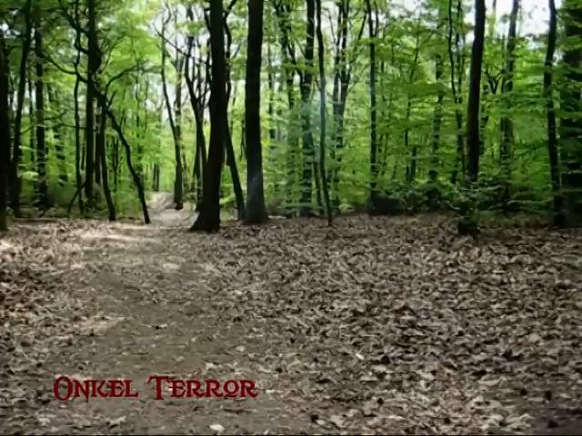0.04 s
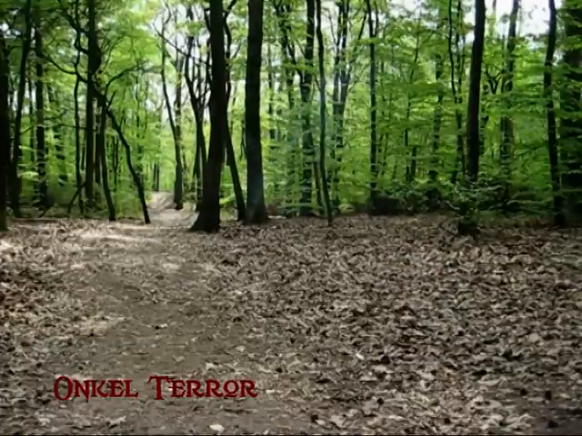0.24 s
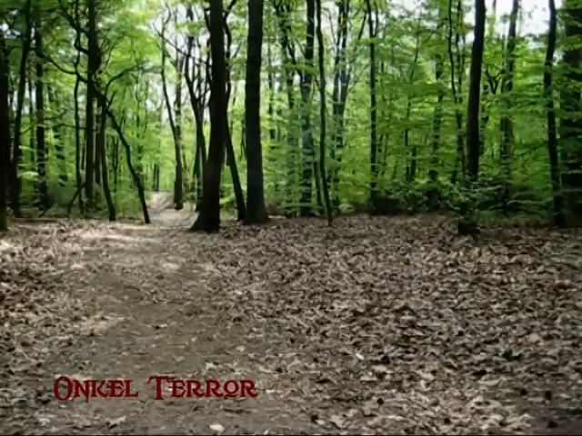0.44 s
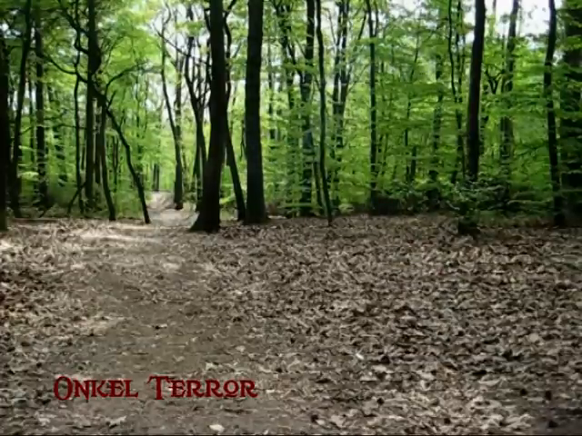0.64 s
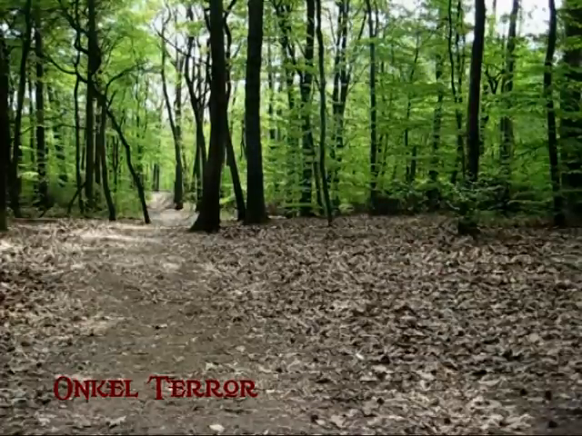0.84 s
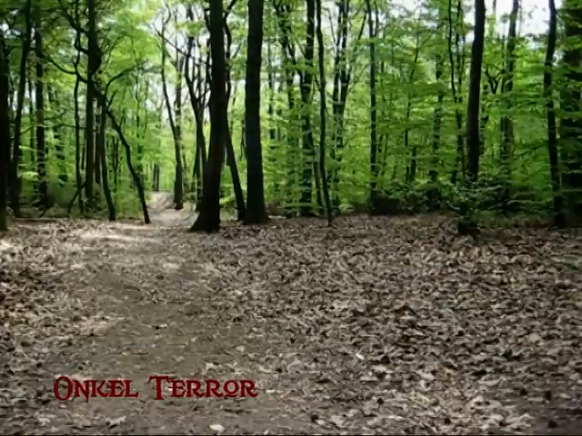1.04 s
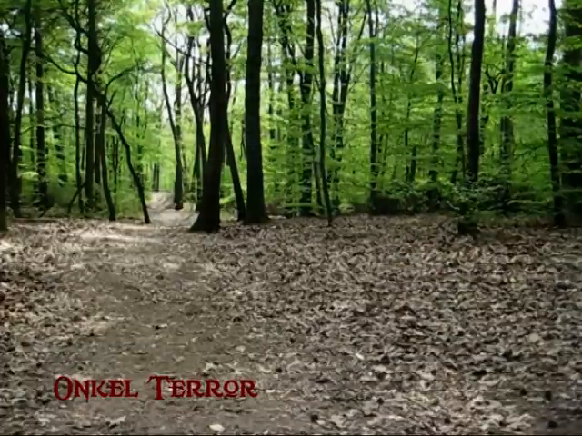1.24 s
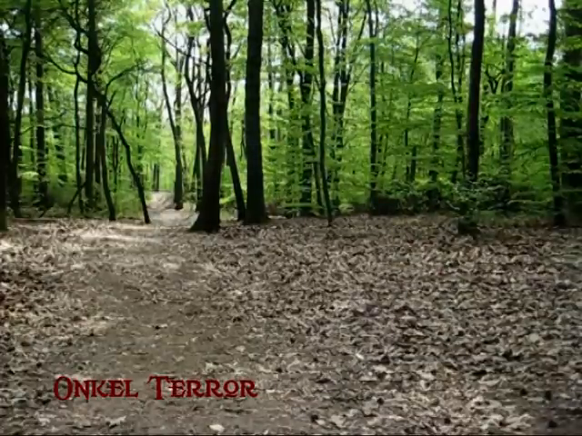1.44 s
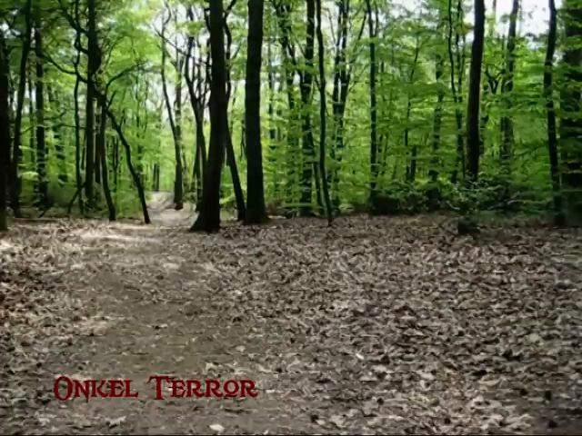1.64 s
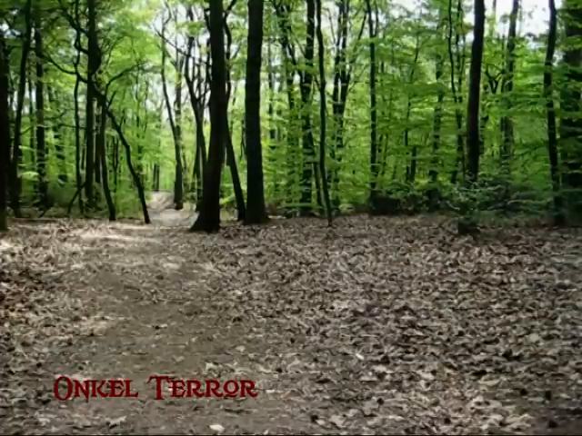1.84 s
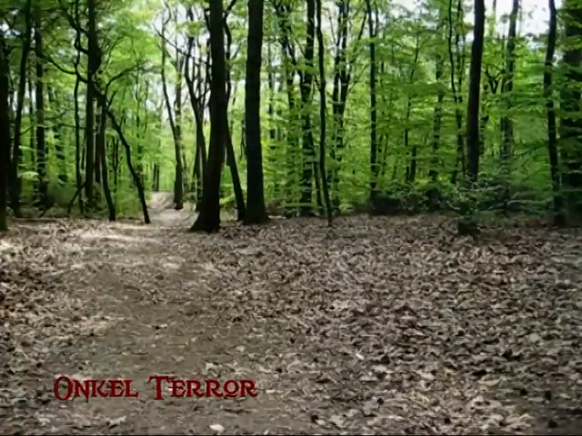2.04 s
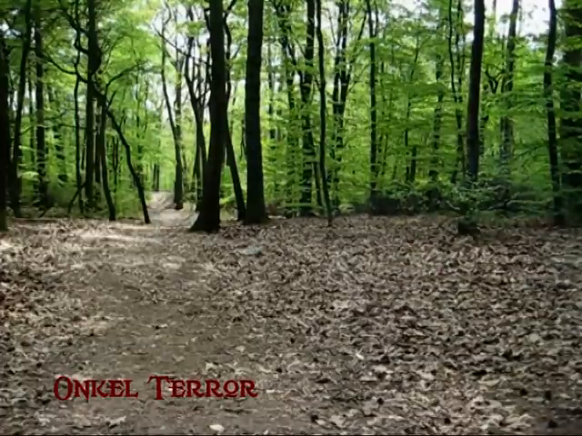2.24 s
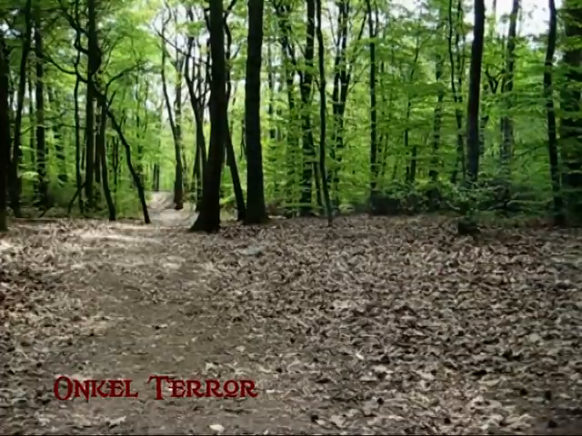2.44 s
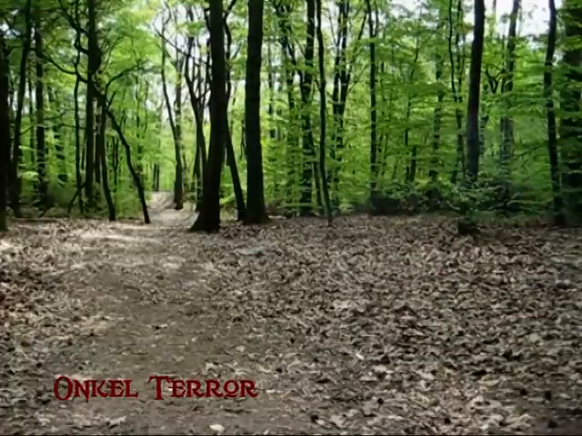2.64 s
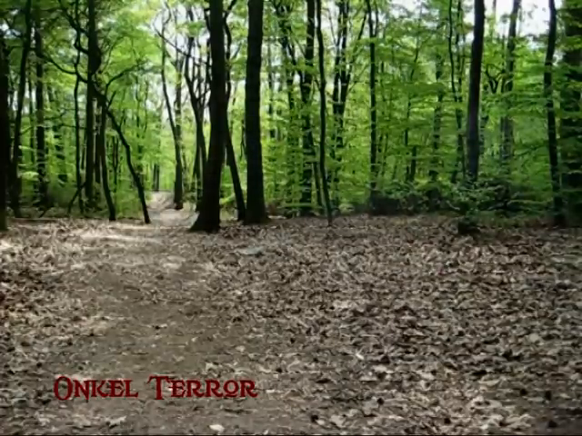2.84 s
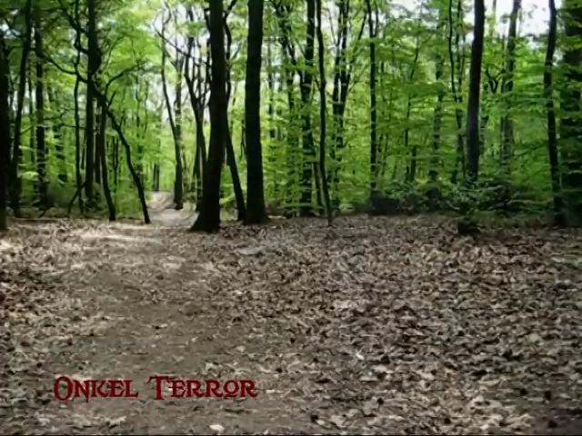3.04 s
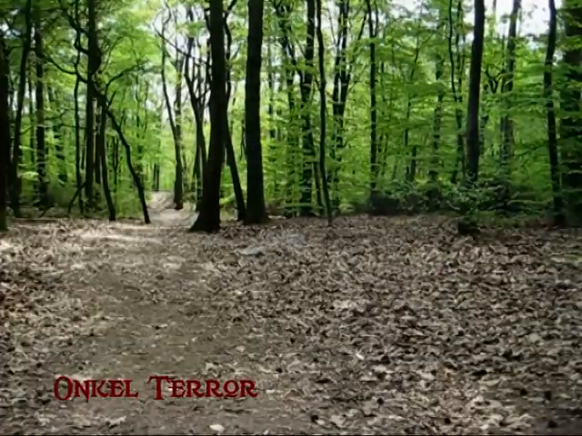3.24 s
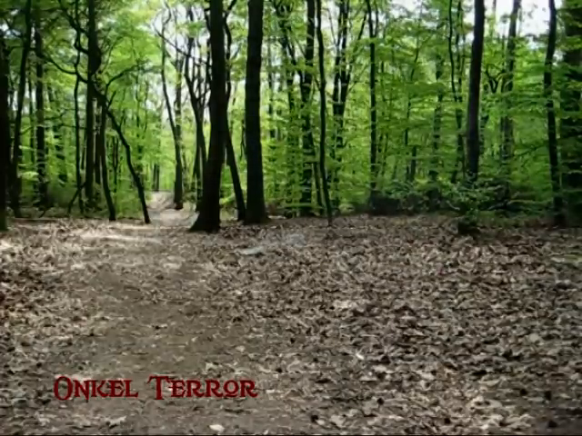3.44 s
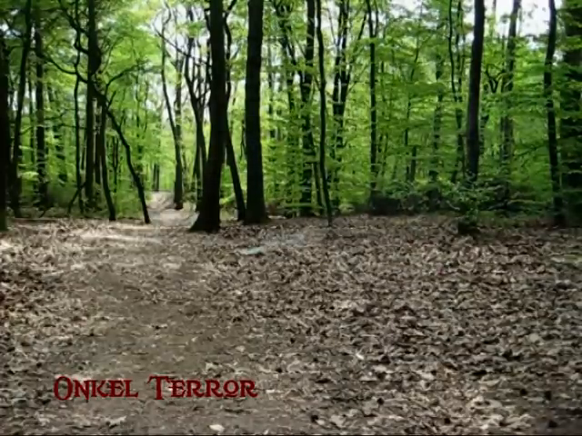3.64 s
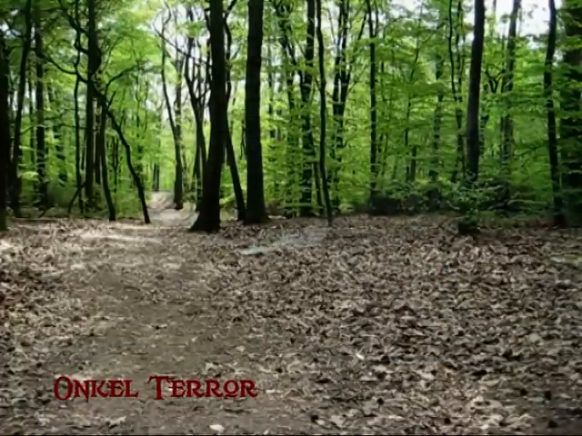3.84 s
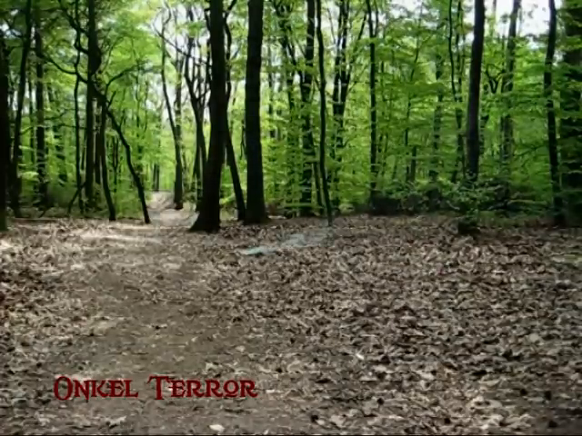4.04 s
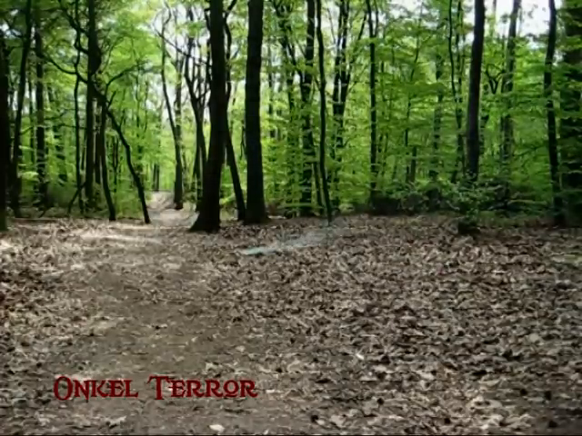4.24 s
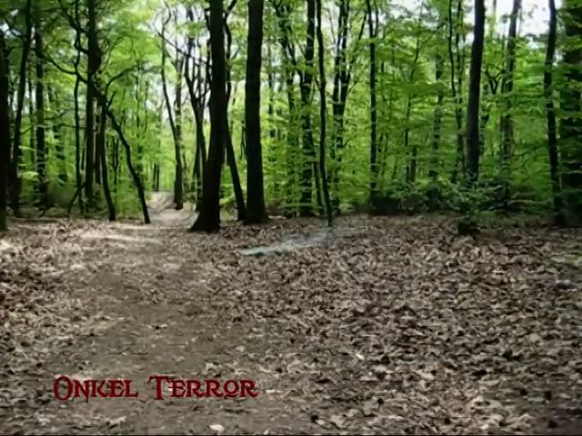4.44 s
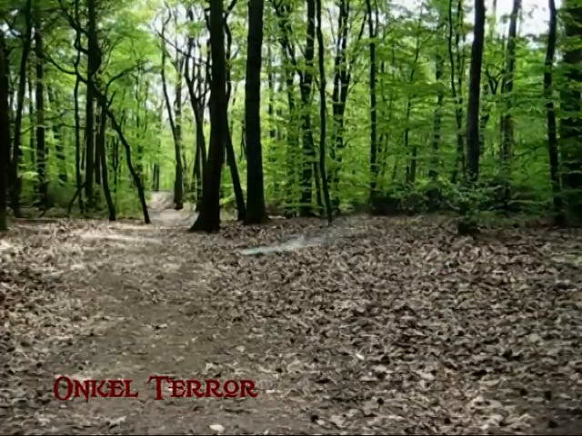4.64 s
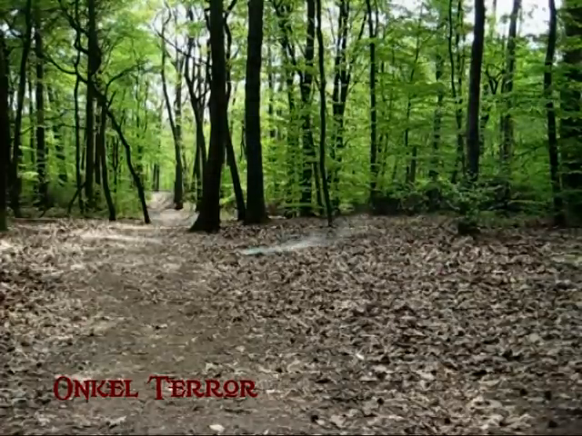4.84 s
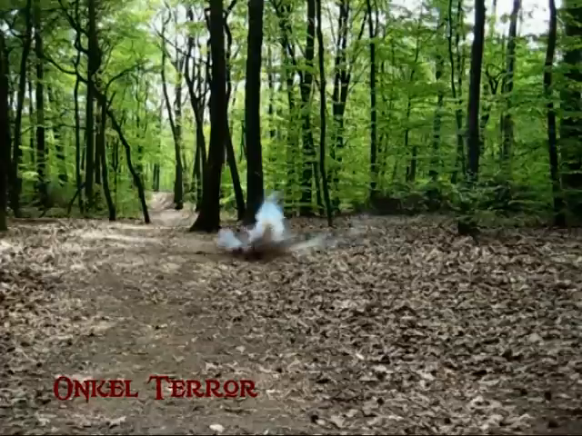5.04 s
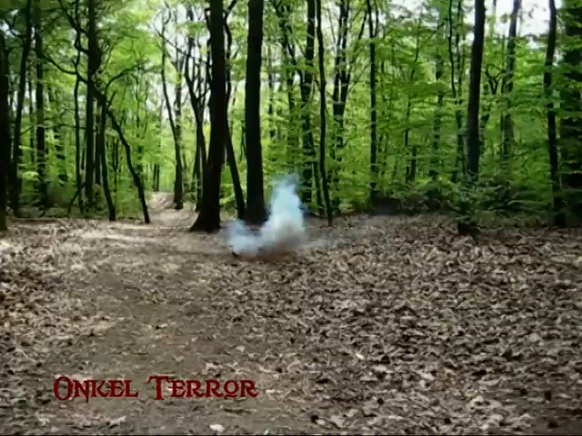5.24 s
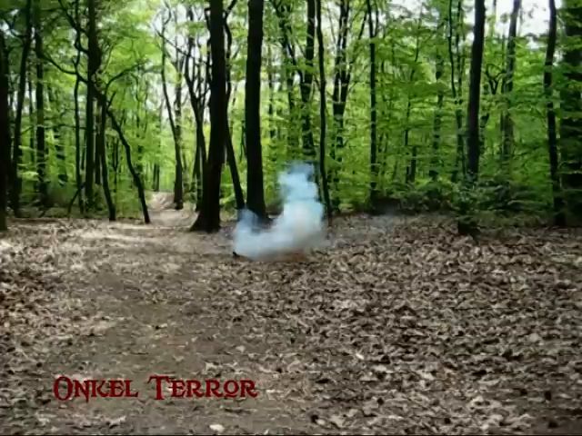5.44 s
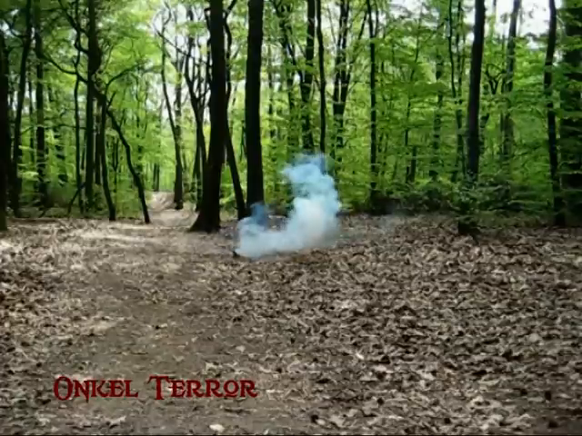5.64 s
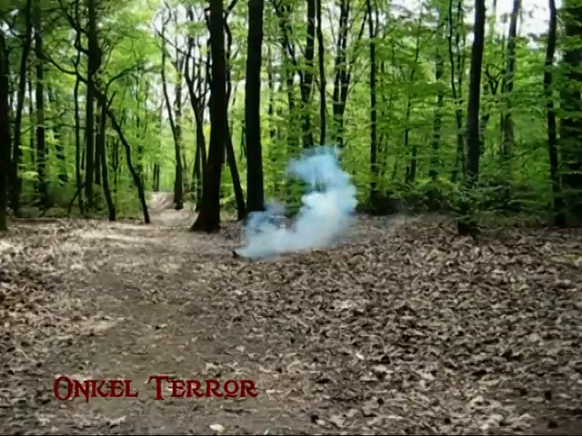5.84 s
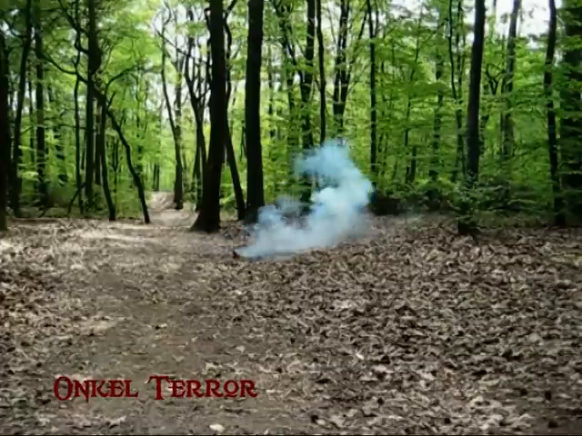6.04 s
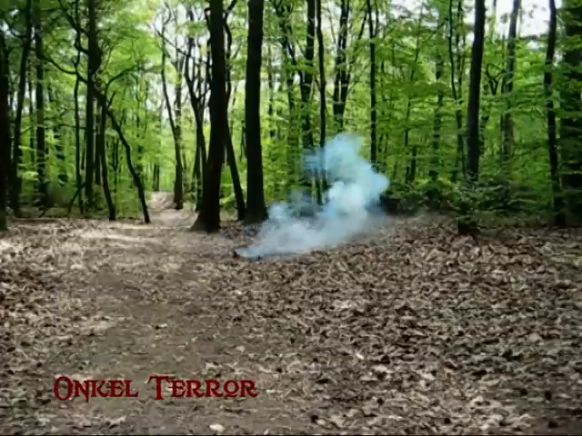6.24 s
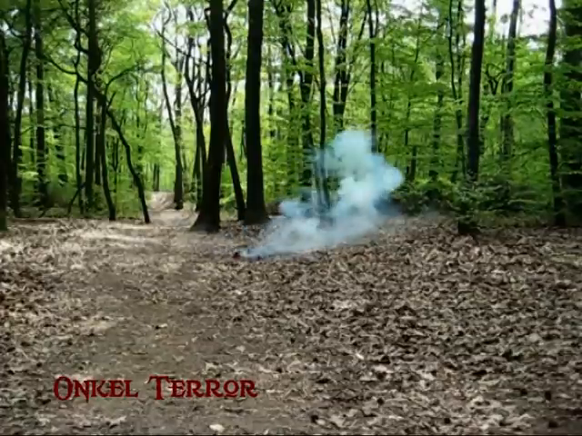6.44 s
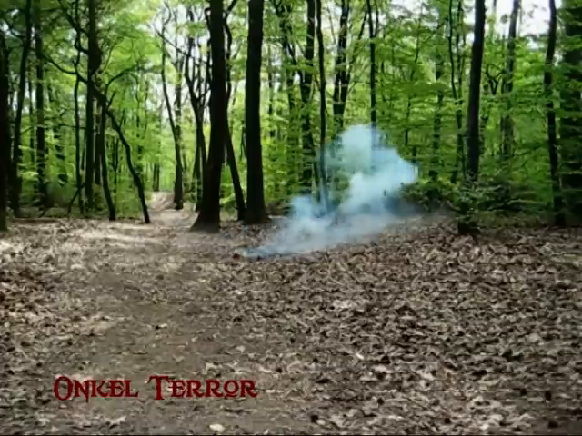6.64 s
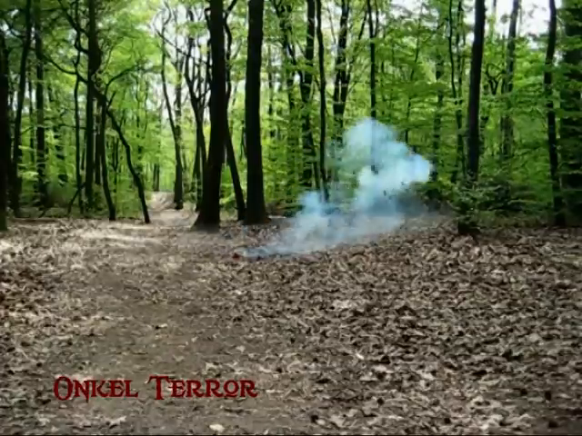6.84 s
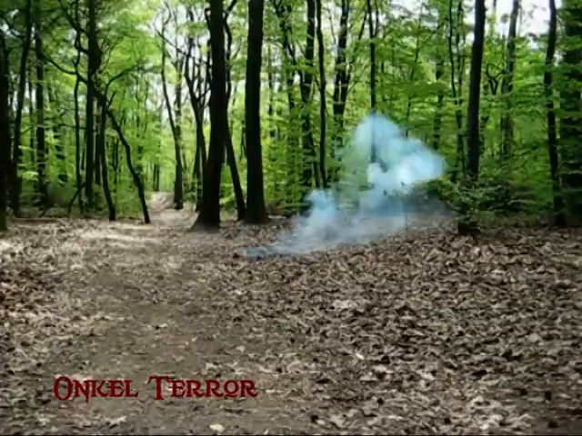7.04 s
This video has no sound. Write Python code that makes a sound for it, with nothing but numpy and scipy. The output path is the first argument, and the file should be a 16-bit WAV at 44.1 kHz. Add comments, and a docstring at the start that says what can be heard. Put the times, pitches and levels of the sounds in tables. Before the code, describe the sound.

In a quiet forest with a light breeze, a firecracker fuse flares with two swishes and a spit, then hisses steadily for about four seconds. A distant bird whistles faintly once. One sharp bang overloads the microphone, and its echo swells among the trees before fading. Small scraps of casing patter down on dry leaves.

```python
"""A firecracker lies on dry leaves in a quiet forest. Its fuse flares with a swishing jet, then hisses steadily; a bird whistles once.
One bang overloads the microphone; the gain control ducks and recovers, so the echo of the trees swells before it fades.
Scraps of the casing patter down on the leaves."""
import sys
import numpy as np
from scipy import signal
from scipy.fft import rfft, irfft, next_fast_len
from scipy.io import wavfile
from scipy.ndimage import uniform_filter1d, map_coordinates

SR = 44100
rng = np.random.default_rng(int(sys.argv[2]) if len(sys.argv) > 2 else 0)


def master_out(mix):
    """Clip the mix to full scale and print it as 16-bit PCM to the path in sys.argv[1]."""
    frames = np.transpose(np.atleast_2d(mix))
    ceiling = np.clip(frames, -1, 1)
    pcm = np.round(ceiling * 32767).astype(np.int16)
    wavfile.write(sys.argv[1], SR, pcm)


N = 313154

HISS = [(1200, -15), (2400, -7.5), (3000, -3.5), (3700, -1), (4500, -3.5), (5400, -6.5), (6000, -8), (6700, -21), (9000, -33)]  # (Hz, dB per Hz)
FIZZ = [(5000, -15), (6700, -6.5), (7800, -1), (9500, -3.5), (11300, -1), (13500, -5.5), (15500, -13.5)]  # (Hz, dB per Hz)
SPARKS = [(800, -33), (2000, -3), (3500, 4), (6500, -1), (9000, -3.5), (12000, -8), (15500, -24)]  # (Hz, dB per Hz)
FOREST = [(20, -18), (50, -5), (100, -4), (150, -7.5), (300, -4.5), (600, -1), (1050, 2.5), (1400, 0.5), (1900, 0), (2600, -5), (4500, -9), (7000, -18), (11000, -37), (15500, -37)]  # (Hz, dB per Hz)
BANG_S = 4.9149
# the shock front and its echoes from the nearest trunks: (s, peak dB, push length s)
SHOCKS = [(4.9149, 36, .0003), (4.9164, 30, .0007), (4.9249, 27.5, .0003), (4.9262, 24.5, .00015), (4.9317, 27.5, .0003), (4.9437, 27, .00015), (4.9444, 27, .0002)]  # fixed
BLAST = [(20, -9), (60, -7), (120, -9), (200, 1), (320, 2), (550, -2), (1200, -1), (3200, -3), (6000, -12), (11000, -22), (16000, -33)]  # (Hz, dB per Hz)  # fixed
TREES = [(25, -38), (70, -27.5), (120, -32.5), (190, -18), (300, -7), (500, -1.5), (1000, 0.5), (2400, 3), (4600, 1), (7600, -2), (12000, -5), (16000, -15)]  # (Hz, dB per Hz)
# scraps landing on leaves: (s, peak dB, rustle t60 s)
SCRAPS = [(5.698, -16, 0.1), (5.7528, -20, 0.11), (5.8243, -13, 0.14), (5.8714, -20, 0.12), (5.9792, -22.5, 0.11),
          (6.0701, -23, 0.1), (6.2188, -22.5, 0.1), (6.378, -23, 0.12), (6.4672, -27.5, 0.1), (6.7516, -33, 0.1),
          (6.8807, -26.5, 0.1)]
LEAVES = [(400, -18), (1500, 6.5), (3500, 1), (6000, -4.5), (9000, -9.5), (13000, -13.5), (16000, -27)]  # (Hz, dB per Hz)
TOP_HZ = 15750  # fixed
TIME = np.arange(N) / SR
# soft bumps near the microphone: (s, level dB, Hz)
BUMPS = [(1.52, -38, 241), (2.17, -40, 190)]
# dry leaves shifting close by: (s, level dB, length s)
RUSTLES = [(0.847, -34, .02), (2.196, -31.5, .012), (3.034, -38, 0.028), (4.05, -37, .05)]
GROUND_ECHO = .68  # fixed
ROAR_T60 = .07  # fixed
SPIT = [(80, -15), (220, 0), (700, -1), (4000, 1), (9000, -5), (15000, -8)]  # (Hz, dB per Hz)  # fixed
# surges of the flaring jet: (start s, crest s, end s, level dB, swing time s, centre of the rush at the crest Hz, spacing of the ground echo's comb at the crest Hz)
SURGES = [(-.05, 0, 0.18, -22.5, 0.16, 2430, 1620), (0.208, 0.307, 0.417, -21, .068, 2880, 3630)]
AWAY_DB, AWAY_CENTRE_HZ, AWAY_SPACING_HZ = -7.5, 4600, 5160  # the jet once it has swung away
JET_EDGE_S = 0.01  # a surge starts and stops this fast
# sprays of sparks while the fuse catches: (s, level dB, half length s)
SPRAYS = [(0, -33, 0.06), (0.28, -30, 0.1), (0.416, -32.5, 0.055), (0.496, -25, 0.047), (0.598, -26, .04), (0.664, -29.5, .035)]
CAUGHT_S = 0.66  # the fuse burns evenly from here on
HISS_DB, HISS_SINK_DB, HISS_SINK_BEND = -33.5, -12.5, 1.38  # at first; change by the end of the burn; how late that change comes
FIZZ_DB, FIZZ_SINK_DB = -39.5, -3  # at first; change by the end of the burn
TILT_DB, TILT_RISE_DB, TILT_BEND = -2.5, 8.5, 3.2  # slope of the fizz per octave: at first; change by the end; how late it comes
SPIT_S, SPIT_DB, SPIT_LENGTH_S = .1814, -18.5, 0.0038  # one sharp spit of the fuse
BREEZE_DB = -35.5  # wind in the crowns
# sound scattered back by ever more distant trees
ECHO_DB, ECHO_FADE_DB_PER_S, ECHO_BUILD_S = 21, 16, 0.12
NEAR_DB, NEAR_T60 = 17, 0.49  # sound scattered back by the undergrowth close by
LITTER_S, LITTER_DB = 5.5, -26.5  # the rain of fine litter at its thickest
LITTER_RISE_DB_PER_S, LITTER_FADE_DB_PER_S = 30, 12
CRUMBS_PER_S, CRUMB_DB, CRUMB_T60 = 25, 6.5, 0.064  # small bits that stand out of the litter
# the bird's one note: when it is loudest, how it swells and dies
WHISTLE_S, WHISTLE_RISE_S, WHISTLE_FALL_S = 2.93, .11, .075  # fixed
WHISTLE_DB, WHISTLE_HZ = -42.5, 3300
JET_TOP_HZ = 9500  # the jet's rush falls off above this
GUST_S, GUST_DB, GUST_HALF_LENGTH_S = 0.27, 1.4, .6  # one mild gust on top of it


def amp(db):
    """Decibels to gain."""
    return 10 ** (np.asarray(db) / 20)


def unit(x):
    """Scale to rms 1."""
    return x / np.sqrt(np.mean(x ** 2) + 1e-20)


def along(points, hz):
    """(Hz, value) points read on a log axis."""
    f, v = np.transpose(points)
    return np.interp(np.log(hz + 1), np.log(f + 1), v)




def wobble(rate):
    """A smooth random curve, rate knots a second."""
    return map_coordinates(rng.standard_normal(int(N * rate / SR) + 4), [TIME * rate])


def filtered(x, response):
    """x times a response of frequency."""
    m = next_fast_len(N + SR // 2)
    return irfft(rfft(x, m) * response(np.fft.rfftfreq(m, 1 / SR)), m)[:N]


def noise(spectrum, grain_db=0):
    """Coloured noise of rms 1; grain_db breaks it into tiny bursts."""
    bursts = rng.standard_normal(N) * amp(grain_db * wobble(1500))
    return unit(filtered(bursts, lambda hz: amp(along(spectrum, hz))))


def swept(x, gain, size=256):
    """x through a filter gain(Hz, s) that changes with time."""
    hz, t, z = signal.stft(x, SR, nperseg=size)
    return signal.istft(z * gain(hz[:, None], t), SR, nperseg=size)[1][:N]


def jet():
    """The first gas rushes out in surges."""
    return sum(surge(*row) for row in SURGES)


def fuse():
    """The fuse flares, spits, then burns evenly; as the flame sinks into the casing the hiss fades and the fizz brightens."""
    caught = np.clip(TIME / CAUGHT_S, 0, 1) ** 2
    hiss = amp(HISS_DB + HISS_SINK_DB * burnt(TIME) ** HISS_SINK_BEND + .35 * wobble(10)) * noise(HISS, grain_db=1.6)
    tilt = lambda hz, t: amp((TILT_DB + TILT_RISE_DB * burnt(t) ** TILT_BEND) * np.log2(np.maximum(hz, 6000) / 10000))
    fizz = amp(FIZZ_DB + FIZZ_SINK_DB * burnt(TIME) + 0.3 * wobble(16)) * swept(noise(FIZZ, grain_db=1.0), tilt)
    spray = sum(amp(db) * swell(s, width) for s, db, width in SPRAYS) * noise(SPARKS, grain_db=1.5)
    spit = amp(SPIT_DB) * np.exp(-np.abs(TIME - SPIT_S) / SPIT_LENGTH_S) * noise(SPIT)
    return (caught * (hiss + fizz) + jet() + spray + spit) * (TIME < BANG_S)


def forest():
    """A light wind in the crowns, and a far bird whose whistle wavers among the trunks."""
    wind = amp(BREEZE_DB + GUST_DB * swell(GUST_S, GUST_HALF_LENGTH_S) + .2 * wobble(7)) * noise(FOREST)
    phase = 2 * np.pi * np.cumsum(WHISTLE_HZ + 5 * wobble(51.4)) / SR
    note = swell(WHISTLE_S, np.where(TIME < WHISTLE_S, WHISTLE_RISE_S, WHISTLE_FALL_S))
    return wind + note * amp(WHISTLE_DB + wobble(50)) * np.sin(phase)


def bang(blast_db=25, rumble_db=-5, rumble_t60=1.0):
    """N-shaped shock fronts, a push then a suck, ride on the roar thrown back by the ground; a low rumble lingers."""
    fronts = np.zeros(N)
    for s, db, push in SHOCKS:
        u = (TIME - s) / push
        fronts += amp(db) * (1 - u) * ((u > 0) & (u < 2))
    fronts = filtered(fronts, lambda hz: 2 / (1 + 1j * hz / 4500) ** 2)  # air rounds the edges
    age = np.maximum(TIME - BANG_S, 0)
    roar = amp(blast_db - 60 * age / ROAR_T60) * noise(BLAST)
    rumble = amp(rumble_db - 60 * age / rumble_t60) * noise([(20, -17), (60, -8), (180, 12), (400, 3), (1500, -67), (6000, -100)])
    return fronts + (roar + rumble) * (1 - np.exp(-age / 0.00024))


def tree_echo(loss_db=7.0, bend=0.62, grain_db=1.5):
    """The undergrowth answers first, then countless trunks; the longer the path, the more treble air and leaves take away."""
    def colour(hz, t):
        khz = hz / 1000  # fixed
        return amp(along(TREES, hz) - loss_db * khz * np.maximum(t - BANG_S, 0) ** bend)
    age = np.maximum(TIME - BANG_S, 0)
    near = amp(NEAR_DB - 60 * age / NEAR_T60)
    far = amp(ECHO_DB - ECHO_FADE_DB_PER_S * age) * (1 - swell(BANG_S, ECHO_BUILD_S))
    returns = rng.standard_normal(N) * unit(amp(grain_db * wobble(900)))
    return np.hypot(near, far) * swept(returns, colour, size=1024) * (TIME > BANG_S)


def debris(scrap_db=-5.5):
    """Scraps crunch into the dry leaves, over a patter of litter and crumbs that sets in fast and thins out slowly."""
    crunch = sum(amp(db + scrap_db) * landing(s, t60) for s, db, t60 in SCRAPS)
    since = TIME - LITTER_S
    litter_db = LITTER_DB + np.minimum(LITTER_RISE_DB_PER_S * since, -LITTER_FADE_DB_PER_S * since)
    patter = amp(litter_db + 1.2 * wobble(60)) * noise(LEAVES, grain_db=1) * (TIME > BANG_S)
    leaves = noise(LEAVES, grain_db=3)
    draws = rng.random((int(CRUMBS_PER_S * since[-1]), 2))
    crumbs = sum(size * landing(LITTER_S + when * since[-1], CRUMB_T60) for when, size in draws)
    return (crunch + amp(litter_db + CRUMB_DB) * crumbs / 2) * leaves + patter


def bumps(length=0.0036):
    """Dull knocks of a few cycles each."""
    return sum(amp(db) * np.exp(-np.abs(TIME - s) / length) * 2 * np.sin(2 * np.pi * hz * (TIME - s)) for s, db, hz in BUMPS)


def rustles():
    """Short, soft scuffs in the leaf litter."""
    swell = sum(amp(db) * np.exp(-np.abs(TIME - s) / length) for s, db, length in RUSTLES)
    return swell * noise([(100, -10), (300, -5), (1000, 4), (2000, -2), (4000, -16), (12000, -28)], grain_db=2.5)  # fixed


def swell(s, width):
    """A bell-shaped envelope that peaks at s."""
    return np.exp(-((TIME - s) / width) ** 2)


def burnt(t):
    """Share of the fuse that is used up, 0 to 1."""
    return np.clip((t - CAUGHT_S) / (BANG_S - CAUGHT_S), 0, 1)


def surge(start, crest, end, db, swing_s, centre_hz, spacing_hz, q=1.05):
    """A gas jet swings past: loudest and deepest at the crest, and combed into moving bands by its echo off the ground."""
    away = lambda t: 1 - np.exp(-((t - crest) / swing_s) ** 2)
    def colour(hz, t):
        ratio = (hz + 1) / (centre_hz + (AWAY_CENTRE_HZ - centre_hz) * away(t) ** 2)
        spacing = spacing_hz + (AWAY_SPACING_HZ - spacing_hz) * away(t)
        rush = 1 / (1 + (q * (ratio - 1 / ratio)) ** 2) / np.sqrt(1 + (hz / JET_TOP_HZ) ** 6)
        gain = rush * np.abs(1 + GROUND_ECHO * np.exp(-2j * np.pi * hz / spacing))
        return gain / np.sqrt(np.mean(gain ** 2, axis=0))
    gate = np.clip(np.minimum(TIME - start, (end - TIME) / 2) / JET_EDGE_S, 0, 1)
    return gate * amp(db + AWAY_DB * away(TIME) + 0.6 * wobble(91)) * swept(rng.standard_normal(N), colour)


def landing(s, t60, tick_db=4, tick_t60=0.011):
    """Envelope of one piece hitting the leaves: a tick, then a short crunch."""
    age = np.maximum(TIME - s, 0)
    return (amp(-60 * age / t60) + amp(tick_db - 60 * age / tick_t60)) * (TIME >= s)


def scene():
    """Everything as it reaches the microphone."""
    return (forest() + bumps() + rustles() + fuse() + bang() + tree_echo() + debris())[None]


def gain_control(x, limit_db=-3, depth_db=25.5, release_db=30.5, attack=0.003, knee_db=2.5):
    """The gain dives after an overload, as far as it can go, climbs back by release_db a second and eases into full level."""
    level_db = 10 * np.log10(np.abs(uniform_filter1d(x ** 2, size=88)) + 1e-12)
    excess = np.minimum(level_db - limit_db, depth_db)
    held = np.maximum.accumulate(excess + release_db * TIME) - release_db * TIME
    duck_db = knee_db * np.logaddexp(0, held / knee_db)
    pole = np.exp(-1 / (attack * SR))
    return x * amp(-signal.lfilter([1 - pole], [1, -pole], duck_db))


def record(dry):
    """The gain control is too slow for the shock, which clips flat at full scale."""
    clipped = np.clip(gain_control(dry[0]), -1, 1)
    return filtered(clipped, lambda hz: hz < TOP_HZ)[None]


dry = scene()
out = record(dry)
master_out(out)
```